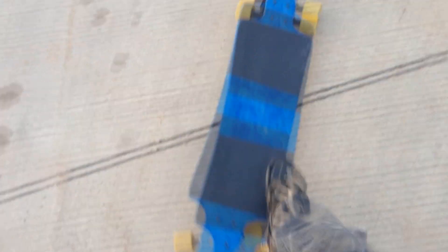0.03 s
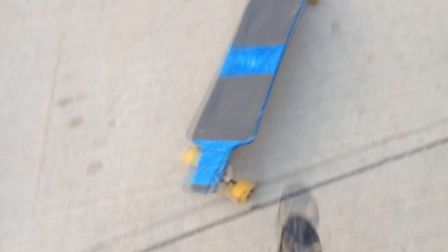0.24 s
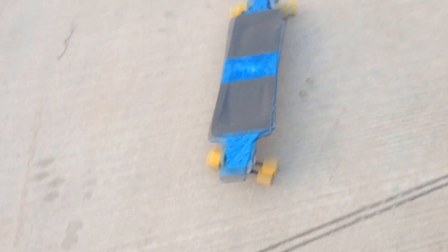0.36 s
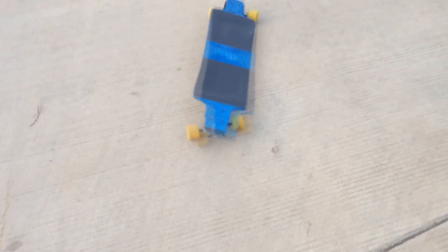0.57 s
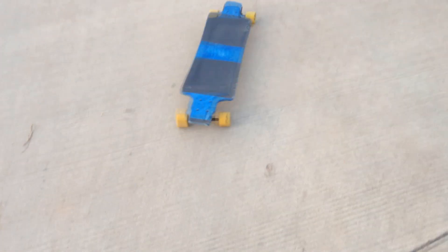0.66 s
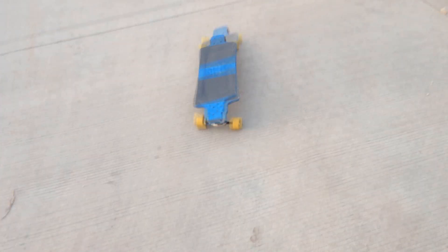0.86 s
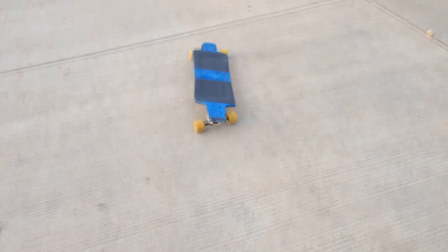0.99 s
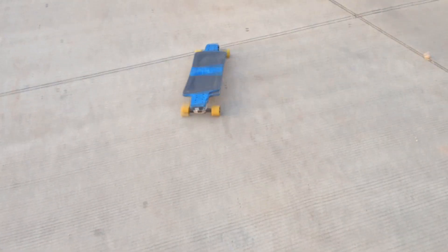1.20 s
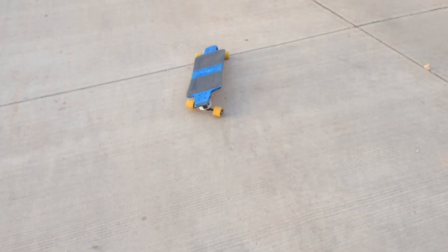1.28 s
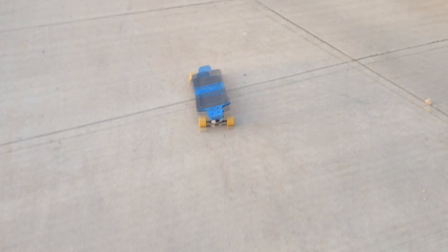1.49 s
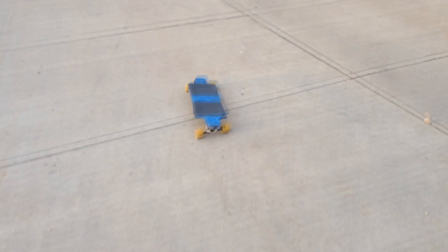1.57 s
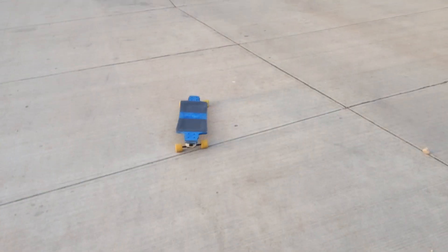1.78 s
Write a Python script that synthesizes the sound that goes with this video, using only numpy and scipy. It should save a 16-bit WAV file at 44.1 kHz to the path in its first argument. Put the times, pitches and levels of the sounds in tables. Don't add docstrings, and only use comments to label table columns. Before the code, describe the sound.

A longboard pushed off by foot clatters and rattles away over rough grooved concrete outdoors

```python
import sys
import numpy as np
from scipy import signal
from scipy.fft import rfft, irfft, next_fast_len
from scipy.io import wavfile
from scipy.ndimage import uniform_filter1d

SR = 44100
rng = np.random.default_rng(int(sys.argv[2]) if len(sys.argv) > 2 else 0)


def voltage_ratio(level):
    return 10 ** (np.asarray(level, float) / 20)


def store_pcm(level_fs):
    pcm = np.round(np.clip(level_fs, -1, 1) * 32767).astype(np.int16)
    wavfile.write(sys.argv[1], SR, np.atleast_2d(pcm).T)


N = 81585

# time in seconds, level in dB, share of metal in dB, strongest deck pitch
# in Hz, which drifts as the board rolls away.
ROLL = [(.14, -52, -7, 830), (.3, -26.5, 4.5, 1320), (.45, -25, -13.5, 1040), (.64, -18.5, -11.5, 1110),
        (.8, -19, -13, 1260), (.94, -22, -20, 1364), (1.2, -20.5, -18, 1550), (1.28, -26, -18.5, 1330),
        (1.44, -26, -18, 1600), (1.55, -23, -44, 1550), (1.72, -38.5, -15.5, 1380),
        (1.85, -41.5, -15, 1290)]


def unit(x):
    return x / np.sqrt(np.mean(x ** 2))


def colour(x, points):
    hz, db = np.array(points, float).T
    bin_hz = np.arange(1, 2050) * SR / 4096
    response_db = np.interp(np.log(bin_hz), np.log(hz), db, -90, -90)
    cepstrum = irfft(np.log(voltage_ratio(response_db)))
    cepstrum[1:2048] *= 2
    cepstrum[2049:] = 0
    impulse = irfft(np.exp(rfft(cepstrum)))
    impulse = unit(impulse) / 64
    size = next_fast_len(len(x) + 4096)
    return irfft(rfft(x, size) * rfft(impulse, size), size)[:len(x)]


def band(x, edges_hz):
    return signal.sosfilt(signal.butter(2, edges_hz, "bandpass", fs=SR, output="sos"), x)


def walk(rate_hz):
    hold = int(SR / rate_hz)
    steps = np.repeat(rng.standard_normal(N // hold + 1), hold)
    smooth = uniform_filter1d(uniform_filter1d(steps, hold), hold)
    return unit(smooth[:N])


def narrow(width_hz):
    pole = np.exp(-np.pi * width_hz / SR)
    noise = rng.standard_normal(N) + 1j * rng.standard_normal(N)
    z = signal.lfilter([1], [1, -pole], noise)
    return z / np.sqrt(np.mean(np.abs(z) ** 2) / 2)


def train(times, sizes):
    return np.bincount(np.clip((times * SR).astype(int), 0, N - 1), sizes, N)


def burst(times, sizes, decay_s, points):
    rise_s = 0.00059
    power = signal.lfilter([1], [1, -np.exp(-2 / (decay_s * SR))], train(times, sizes ** 2))
    keep = np.exp(-1 / (rise_s * SR))
    power = signal.lfilter([1 - keep], [1, -keep], power)
    return colour(np.sqrt(np.abs(power)) * rng.standard_normal(N), points)


def ring(times, sizes, modes, focus_db=0, fade_db=0):
    mode_scatter, upper_hz = 0.87, 2100
    mix = 1 + mode_scatter * rng.standard_normal((len(times), len(modes)))
    focus_hz = np.interp(times, np.array(ROLL)[:, 0], np.array(ROLL)[:, -1])
    out = 0
    for k, (hz, width_hz, db) in enumerate(modes):
        if hz > upper_hz:
            loss_db = fade_db * times
        else:
            loss_db = focus_db * np.log2(hz / focus_hz) ** 2
        strikes = train(times, sizes * mix[:, k] * voltage_ratio(db - loss_db))
        r = np.exp(-np.pi * width_hz / SR)
        w = 2 * np.pi * hz / SR
        mode = signal.lfilter([0, np.sin(w)], [1, -2 * r * np.cos(w), r * r], strikes)
        out = out + (-1) ** k * mode
    return out / np.sqrt(sum(voltage_ratio(2 * db) for _, _, db in modes))


def struck(rows, t60_s, push_s, gain_db=0):
    out = np.zeros(N)
    for s, db, hz in rows:
        first, last = int(s * SR) + 1, int((s + t60_s) * SR)
        u = np.arange(N)[first:last] / SR - s
        level = voltage_ratio(db + gain_db - 60 * u / t60_s) * (1 - np.exp(-u / push_s))
        out[first:last] += level * np.sin(2 * np.pi * hz * u)
    return out


def scuff(t):
    # frequency in Hz, strength in dB per Hz.
    hiss_colour = [(1470, -54), (2500, -63), (3630, 0), (3950, -5), (4270, -1), (5270, -5), (6700, -11),
                   (14500, -36), (16000, -56)]
    # pitch in Hz, width in Hz, level in dB.
    sole = [(3760, 97, -5), (4370, 43, -2.5), (5110, 61, 0), (5500, 40, 0)]
    level_db, end_s, fade_s, ridges_db = -49, 0.068, 0.026, -1.5
    fade = voltage_ratio(level_db + 2.0 * walk(64)) / (1 + np.exp((t - end_s) / fade_s))
    hiss = unit(colour(rng.standard_normal(N), hiss_colour))
    ridges = 0
    for hz, width_hz, db in sole:
        ridges = ridges + voltage_ratio(db) * (narrow(width_hz) * np.exp(2j * np.pi * hz * t)).real
    return fade * (hiss + voltage_ratio(ridges_db) * unit(ridges))


def air(t):
    # frequency in Hz, strength in dB per Hz.
    hush_colour = [(59, -41), (100, -3), (471, -7.5), (1280, -9.5), (1390, -12.5), (1580, -15), (2690, -25),
                   (13200, -34.5), (16000, -47)]
    hush_db = -55.5
    # frequency in Hz, strength in dB per Hz.
    wind_colour = [(20, -31), (35, -14), (55, -2), (140, -2), (200, 5), (300, -35)]
    wind_db, gust_db = -64, 1.5
    early_db, early_s = 5, .2
    hush_level = voltage_ratio(hush_db + early_db * (t < early_s) + walk(9.8))
    hush = hush_level * unit(colour(rng.standard_normal(N), hush_colour))
    wind = voltage_ratio(wind_db + gust_db * walk(5.3)) * unit(colour(rng.standard_normal(N), wind_colour))
    return hush + wind


def hollow(t):
    # time in seconds, level in dB, pitch in Hz.
    hum = [
        (.11, -59, 350),
        (0.163, -42.5, 356.8),
        (.265, -31, 530.7),
        (.33, -39, 473.6),
        (.39, -29.5, 409),
        (.48, -68, 402),
    ]
    s, db, hz = np.array(hum).T
    turn = np.exp(2j * np.pi * np.cumsum(np.interp(t, s, hz)) / SR)
    return voltage_ratio(np.interp(t, s, db, -99, -99)) * (narrow(50) * turn).real


def hits():
    # start in seconds, level in dB, pitch in Hz.
    thuds = [
        (0.121, -28.5, 358),
        (0.133, -24, 352),
        (0.183, -22, 364),
        (0.345, -18, 414),
        (0.374, -20, 320),
        (0.738, -26.5, 222),
        (0.953, -23.5, 265),
        (1.007, -21, 247),
    ]
    # start in seconds, level in dB, pitch in Hz.
    knocks = [(.202, -14.5, 960), (0.2387, -11, 1024), (0.304, -10.5, 1586), (.336, -5.5, 1528),
              (.344, -6, 1610), (.369, -9, 950), (.415, -11.5, 930), (.579, -7.5, 1262), (0.585, -3, 1273),
              (0.618, 0.5, 1298), (0.627, -3, 1270), (.674, -4.5, 1299), (.689, -8.5, 1250),
              (.719, -8.5, 1250), (.832, -10, 1270), (.856, -8.5, 1127), (.967, -6, 1297), (.986, -6, 1080),
              (1.006, -2, 1330), (1.147, -4.5, 1770), (1.295, -8, 1272), (1.343, -10.5, 1550),
              (1.394, -11.5, 1573), (1.491, 0, 1760), (1.508, -7, 1573), (1.559, -7.5, 1530),
              (1.584, -9, 1570), (1.652, -17, 1270)]
    # start in seconds, level in dB, pitch in Hz.
    pings = [
        (.463, -24, 3710),
        (0.489, -20, 3700),
        (.513, -12.5, 3760),
        (0.514, -17.5, 5280),
        (.545, -24, 3760),
        (.580, -9.5, 3410),
        (.955, -19, 3920),
    ]
    # start in seconds, level in dB.
    ticks = [(0.1326, -41), (0.1705, -39), (0.2009, -33), (0.2488, -17), (0.262, -17), (0.2957, -20.5),
             (0.3411, -18.5), (0.3611, -25), (0.3714, -25), (0.405, -35), (0.511, -28.5), (0.546, -29),
             (0.6044, -22), (0.6217, -23), (0.628, -16), (0.6734, -31), (0.741, -43), (0.763, -30),
             (0.834, -25), (0.8535, -39), (0.9065, -37), (0.953, -37), (0.9664, -42), (1.016, -25),
             (1.064, -27), (1.0735, -20.5), (1.1428, -12.5), (1.187, -31), (1.216, -31), (1.235, -27),
             (1.298, -41), (1.3763, -30.5), (1.4753, -28), (1.487, -20), (1.5974, -46), (1.707, -56),
             (1.7918, -61)]
    # frequency in Hz, strength in dB per Hz.
    tick_colour = [(4000, -4), (6500, 1), (13500, -24), (16000, -50)]
    tick_band = [3600, 20000]
    s, db = np.array(ticks).T
    out = band(burst(s, voltage_ratio(db - 7.5), 0.0029, tick_colour), tick_band)
    out = out + struck(thuds, t60_s=0.035, push_s=0.001)
    out = out + struck(pings, t60_s=0.024, push_s=0.00044)
    return out + struck(knocks, t60_s=0.047, push_s=0.0003, gain_db=-4)


def board(times, sizes, metal, treble_db=0):
    # pitch in Hz, width in Hz, level in dB.
    deck_modes = [(683.7, 26.6, -5.5), (860.5, 36, -2.5), (930, 163, -1.5), (1075, 39.7, -4.5),
                  (1290, 67.6, -1.5), (1550, 72, -2), (1793, 85, -1.5), (1940, 41.4, -6.5), (2204, 84, 0.5),
                  (2458, 144, -4.5)]
    # pitch in Hz, width in Hz, level in dB.
    axle_modes = [(3333, 116, 0), (3830, 183, 3.5), (3844, 150, 4), (4150, 90, -0.5), (4500, 530, 7.5),
                  (5215, 116, 2)]
    # frequency in Hz, strength in dB per Hz.
    body_colour = [(290, -68), (500, -21), (1280, 1), (2800, -20.5), (3640, -20), (6160, -120)]
    # frequency in Hz, strength in dB per Hz.
    crack_colour = [(1650, 12), (2800, 1), (2950, -7), (3260, 4.5), (4560, -12), (5280, -14), (14400, -51),
                    (16000, -61)]
    deck_band = [506, 5260]
    axle_band = [1620, 4400]
    crack_edges = [2540, 5700, 9450, 15400]
    crack_db = [-2.5, 10, 8.5]
    body_db, knock_s, crack_s, crack_scatter_db = -9, 0.003, .0028, 4.5
    treble_fade_db_per_s = 2

    deck = ring(times, sizes, deck_modes, focus_db=12, fade_db=9)
    knock = voltage_ratio(body_db) * burst(times, sizes, knock_s, body_colour)
    out = band(band(deck, deck_band) + knock, deck_band)
    out = out + band(ring(times, metal, axle_modes), axle_band)

    treble = np.outer(treble_db - treble_fade_db_per_s * times, np.arange(3) > 0)
    scatter = crack_scatter_db * rng.standard_normal((len(times), 3))
    tint = voltage_ratio(np.array(crack_db) + treble + scatter)
    for k in range(3):
        crack = burst(times, metal * tint[:, k], crack_s, crack_colour)
        out = out + band(crack, crack_edges[k:k + 2])
    return out


def rolling(t):
    # frequency in Hz, strength in dB per Hz.
    boom_colour = [(35, -83), (60, -5), (108, -43), (145, -6.5), (235, -6.5), (308, -1), (700, -5.5),
                   (910, -10), (1540, -120)]
    # time in seconds, level in dB.
    boom_path = [
        (.105, -51),
        (.135, -39),
        (.25, -34.5),
        (.42, -39),
        (.5, -41.5),
        (.8, -43.5),
        (1.25, -52.5),
        (1.85, -82),
    ]
    grit_per_s, grit_scatter_db, patchy_db, boom_patchy_db = 900, 3.0, 1.5, 3.0
    grit_db, metal_gain_db = -12.5, 3.5
    s, db, metal_db, _ = np.array(ROLL).T
    level = np.interp(t, s, db, -90) + patchy_db * walk(35.83)
    times = np.sort(rng.random(int(grit_per_s * N / SR))) * N / SR
    scatter = grit_scatter_db * rng.exponential(size=(2, len(times)))
    tick_db = np.interp(times, t, level) + grit_db
    tick_metal_db = tick_db + np.interp(times, s, metal_db) + metal_gain_db
    grit = board(times, voltage_ratio(tick_db + scatter[0]), voltage_ratio(tick_metal_db + scatter[1]))

    boom_level = np.interp(t, *np.array(boom_path).T, -90) + boom_patchy_db * walk(45.62)
    return grit + voltage_ratio(boom_level) * unit(colour(rng.standard_normal(N), boom_colour))


def rattle():
    # start in seconds, level in dB, share of metal in dB, rattle length in seconds.
    near_jolts = [(0.179, -25.5, -9, 0.016), (0.208, -16, -11, 0.0082), (0.217, -16.5, -6.5, 0.031),
                  (0.242, -7, -8, 0.023), (0.261, -6.5, -6.5, 0.016), (0.275, -6.5, -16.5, 0.027),
                  (0.293, -10, -24, 0.062), (0.336, -5, 1, 0.017), (0.366, -5.5, -5, 0.027),
                  (0.401, -8, -0.5, 0.019), (0.461, -23, 1.5, 0.02), (0.484, -12, -17, 0.012),
                  (0.512, -5, -13, 0.022), (0.541, -6.5, -3.5, 0.015), (0.578, -2.5, -11.5, 0.03),
                  (0.615, -1, -9.5, 0.015), (0.624, 1, -8.5, 0.023), (0.656, -5, -7.5, 0.031),
                  (0.674, -2, -17, 0.0057), (0.696, -23.5, -1, 0.031), (0.725, -2.5, -21, 0.009),
                  (0.736, -4.5, -8.5, 0.027), (0.766, -2, -15, 0.022), (0.783, -9.5, -13, 0.029),
                  (0.828, -7.5, -10, 0.034), (0.856, -1.5, -17, 0.031), (0.889, -10, -17, 0.03),
                  (0.903, -8, -9.5, 0.014), (0.92, -34, -30, 0.0031)]
    # start in seconds, level in dB, share of metal in dB, length in seconds.
    far_jolts = [(0.953, -7, -16, 0.024), (0.965, -1, -15.5, 0.015), (0.985, -0.5, -18.5, 0.057),
                 (1.006, 4, -14.5, 0.0044), (1.012, 6, -14, 0.013), (1.032, -17, -7.5, 0.046),
                 (1.049, -6.5, -14, 0.015), (1.067, -3, -10, 0.013), (1.102, -2.5, -18, 0.014),
                 (1.144, 1.5, -13.5, 0.017), (1.183, -9.5, -16, 0.023), (1.198, -6, -17, 0.02),
                 (1.219, -11.5, -8, 0.018), (1.231, -6.5, -21.5, 0.016), (1.297, -4.5, -31.5, 0.01),
                 (1.345, -8.5, -19, 0.016), (1.383, -14.5, -15, 0.02), (1.392, -3.5, -17.5, 0.021),
                 (1.41, -8, -27, 0.0073), (1.459, -6.5, -39, 0.053), (1.479, -6, -13.5, 0.0099),
                 (1.493, 3, -11.5, 0.0097), (1.507, -5.5, -19, 0.038), (1.556, -3, -18, 0.01),
                 (1.578, -7, -18.5, 0.019), (1.613, -15, -18, 0.03), (1.649, -13, -19, 0.019),
                 (1.682, -18, -20.5, 0.019), (1.741, -21.5, -15, 0.0057), (1.752, -26.5, -22, 0.026)]
    clack_gap_s, clack_scatter_db, jolt_db, jolt_metal_db = .0042, 4, -9, 8
    start, db, metal_db, length_s = np.array(near_jolts + far_jolts).T[:, :, None]
    chance = rng.random((len(start), 3, 16))
    gaps = clack_gap_s * (.4 + 1.2 * chance[:, 0])
    late = np.cumsum(gaps, axis=1) - gaps[:, :1]
    size_db = db + jolt_db + clack_scatter_db * (2 * chance[:, 1] - 1)
    size = voltage_ratio(size_db) * np.exp(-(late / length_s) ** 2)
    metal = size * voltage_ratio(metal_db + jolt_metal_db + clack_scatter_db * (2 * chance[:, 2] - 2))
    return board((start + late).ravel(), size.ravel(), metal.ravel(), treble_db=-3)


def scene():
    t = np.arange(N) / SR
    mix = scuff(t) + air(t) + hollow(t) + hits() + rolling(t) + rattle()
    return mix[None]


def top_cut(x):
    return signal.sosfilt(signal.butter(12, 16480, fs=SR, output="sos"), x)


def record(dry):
    limit, top_hz = .95, 16300
    soft = dry / (1 + np.abs(dry / limit) ** 6) ** (1 / 6)
    low_pass = signal.ellip(8, .2, 60, top_hz, fs=SR, output="sos")
    return top_cut(signal.sosfilt(low_pass, band(soft, [30, 20000])))


dry = scene()
out = record(dry)
store_pcm(out)
```